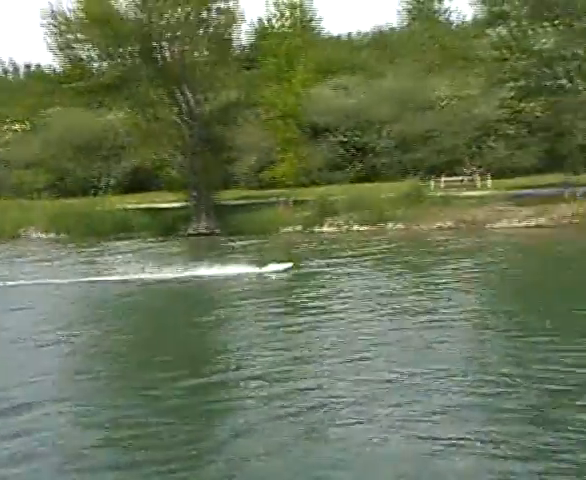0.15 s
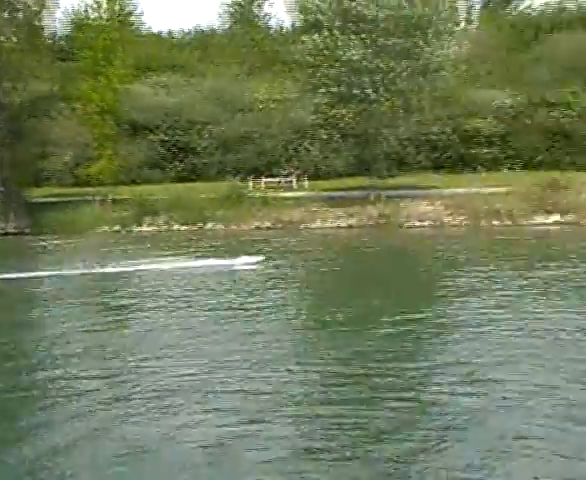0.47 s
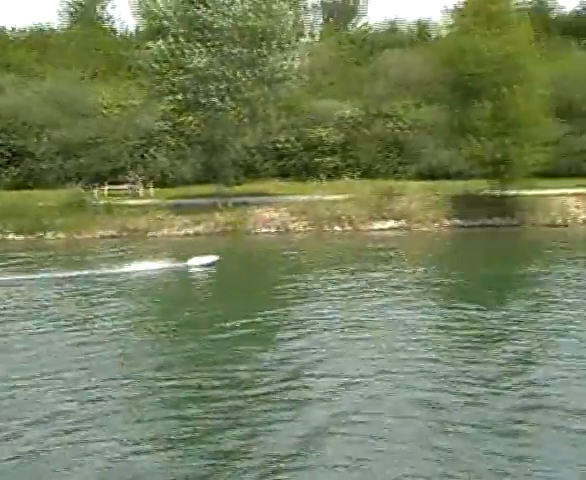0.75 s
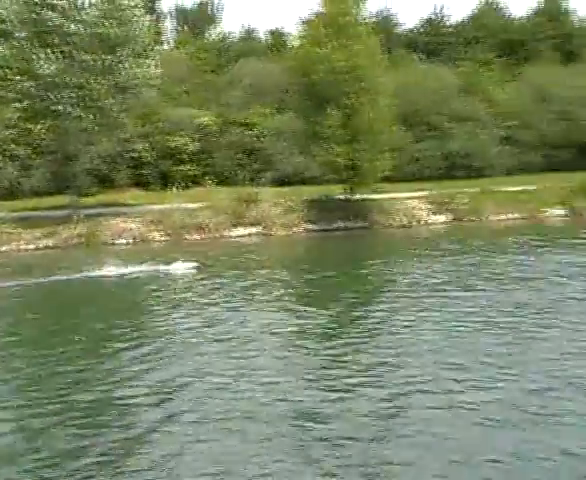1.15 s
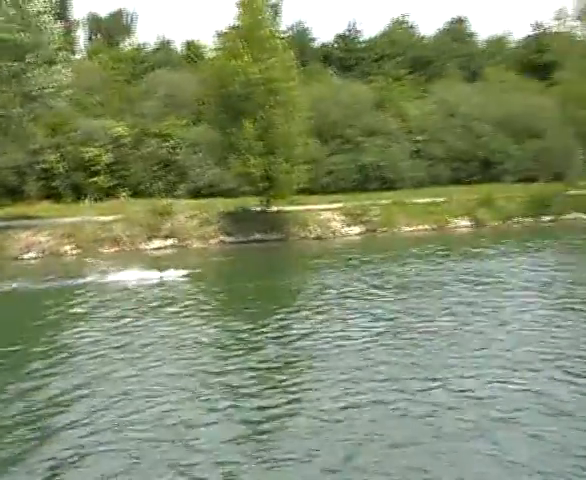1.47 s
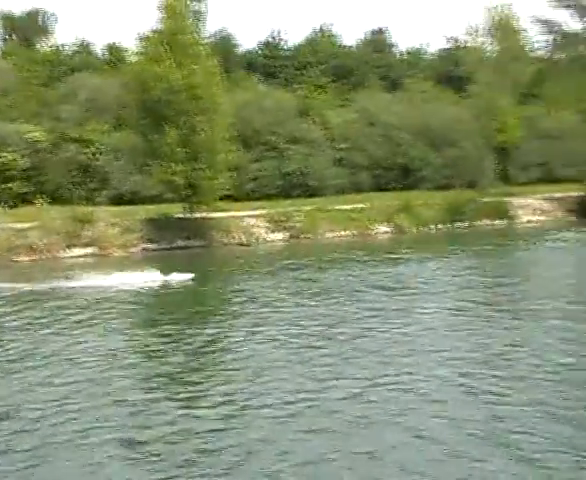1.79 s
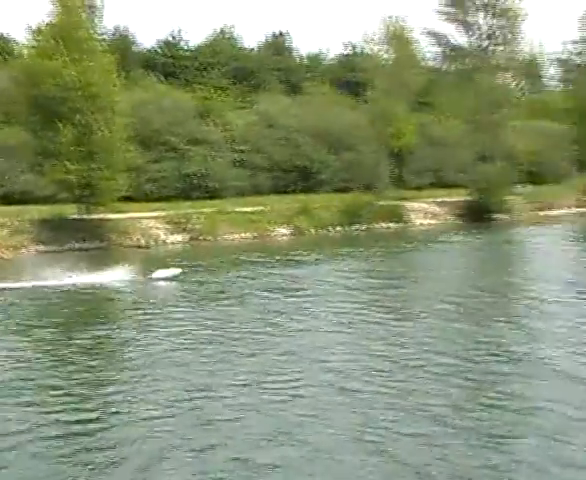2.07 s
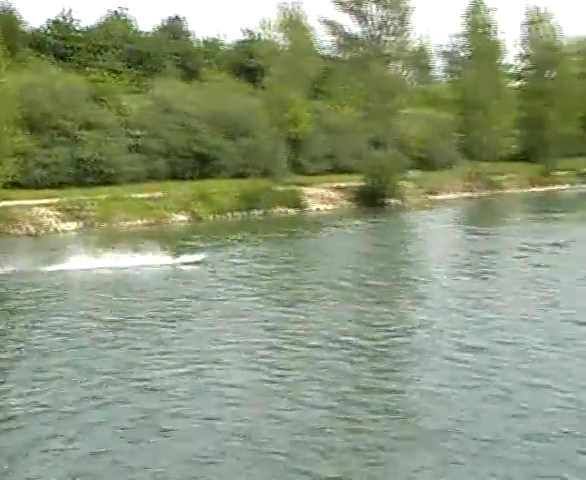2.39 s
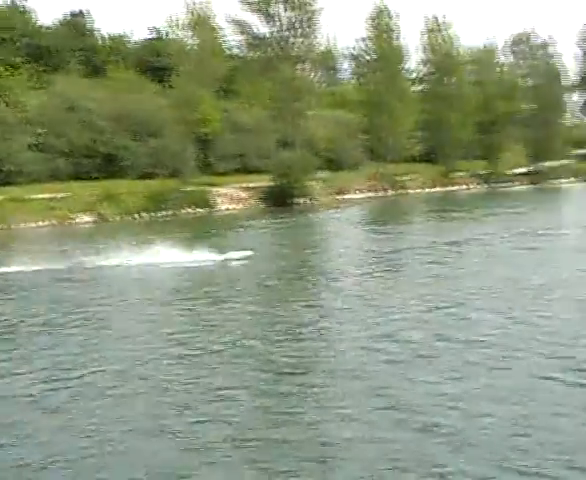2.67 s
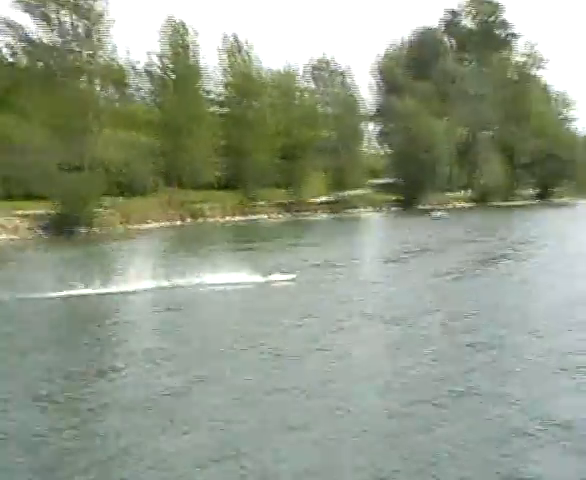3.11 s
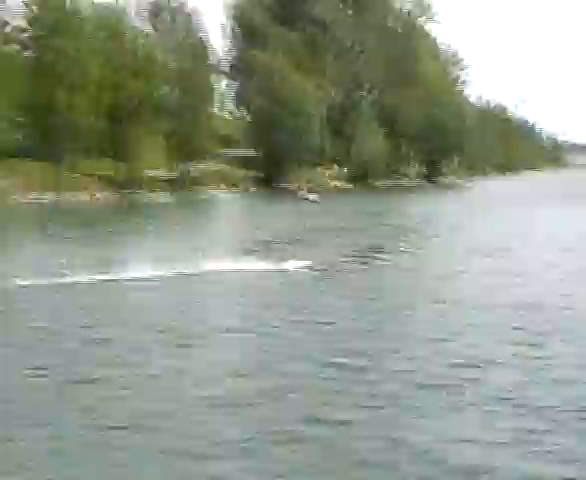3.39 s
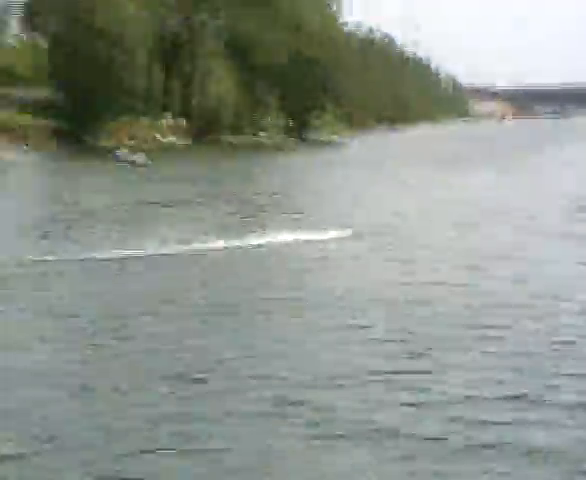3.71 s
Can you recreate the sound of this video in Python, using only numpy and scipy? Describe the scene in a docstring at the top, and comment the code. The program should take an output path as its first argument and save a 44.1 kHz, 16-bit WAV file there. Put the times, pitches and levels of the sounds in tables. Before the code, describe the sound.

Outdoors by a river, a small electric boat buzzes unsteadily, throttles off, and returns with a higher, rougher whine and hissing spray, briefly breaking up over ripples; wind buffets the microphone and the far bank echoes faintly.

```python
"""A model racing boat crosses a river: its electric motor drives a two-bladed propeller, built from
smeared overtones of the blade rate plus pulsing noise for spray. It throttles back, speeds up again and
skips over ripples; in the air the whine drops and the freed shaft hums a sine at half the blade rate.
The far bank returns a scattered echo, shaped noise makes wash, slaps and splashes, and wind buffets
the stereo microphone with slow noise, flutter and slowing swings of pressure."""
import sys
import numpy as np
from scipy import signal
from scipy.fft import rfft, irfft, next_fast_len
from scipy.io import wavfile
from scipy.ndimage import map_coordinates

SR = 44100
rng = np.random.default_rng(int(sys.argv[2]) if len(sys.argv) > 2 else 0)


def output_pcm(signal):
    """Save a mono or channel-first signal as 16-bit PCM at the path in sys.argv[1].

    Samples are clipped to [-1, 1] before scaling.
    """
    pcm = np.clip(np.atleast_2d(signal).T, -1, 1) * 32767
    wavfile.write(sys.argv[1], SR, np.round(pcm).astype(np.int16))


N = 169785

# Propeller speed before jitter: t/s, blade rate f/Hz
BLADE_RATE = [(0,715),(.11,645),(.145,712),(.2,680),(.32,650),(.37,678),(.395,728),(.425,675),(.452,725),(.475,700),(.525,600),(.555,590),(.58,505),(.72,370),(1.45,390),(1.62,525),(1.72,640),(1.76,592),(1.85,665),(1.9,658),(1.97,695),(2.035,755),(2.055,830),(2.09,772),(2.2,742),(2.26,820),(2.3,1080),(2.35,1220),(2.375,1160),(2.4,1010),(2.44,900),(2.472,980),(2.5,910),(2.585,895),(2.62,1100),(2.68,1310),(2.7,1200),(2.735,1070),(2.785,1010),(2.86,895),(2.91,915),(2.96,1070),(2.995,1140),(3.025,1150),(3.07,990),(3.12,888),(3.17,925),(3.2,1060),(3.235,1150),(3.275,1080),(3.31,930),(3.365,965),(3.395,870),(3.475,825),(3.51,900),(3.54,905),(3.58,780),(3.68,700),(3.81,728),(3.85,695)]
# How hard the propeller bites: t/s, whine level/dB, spray level/dB (before SPRAY_DB and contact changes)
BITE_LEVELS = [(0,-29,-37.5),(.12,-25,-38),(.185,-16.5,-34.5),(.23,-24.5,-35),(.315,-24,-40),(.366,-15,-35),(.4,-22,-37),(.43,-13,-33.5),(.465,-22.5,-32.5),(.5,-19,-41.5),(.53,-37,-29.5),(.56,-36.5,-36.5),(.68,-61,-40),(1,-74,-61),(1.52,-54,-50),(1.71,-33,-36.5),(1.82,-27.5,-41),(1.98,-28,-40),(2.05,-18.5,-34.5),(2.14,-19.5,-37.5),(2.2,-23.5,-39),(2.39,-18.5,-29),(2.435,-21.5,-31),(2.47,-22,-29.5),(2.54,-25.5,-31),(2.745,-20.5,-31.5),(2.79,-16,-31.5),(2.86,-26.5,-32),(2.925,-16,-33.5),(3.04,-19.5,-31),(3.12,-19,-34.5),(3.205,-14.5,-32),(3.232,-23.5,-29.5),(3.274,-13.5,-28.5),(3.3,-19.5,-37.5),(3.37,-17.5,-30),(3.46,-20.5,-35.5),(3.53,-21,-30),(3.68,-25.5,-32),(3.78,-31.5,-32.5),(3.82,-24,-27.5),(3.85,-26,-35)]
# How much the water churns round the blades: t/s, roughness (0 to 1)
ROUGHNESS = [(0,.33),(.3,.3),(.42,.15),(.55,.22),(1.7,.5),(1.92,.48),(2.03,.3),(2.2,.55),(2.45,.7),(2.8,.62),(3.2,.5),(3.5,.53),(3.85,.38)]
# Propeller out of the water: start t/s, length t/s, level change/dB
AIR_HOPS = [(2.28,.092,-22),(2.607,.117,-22),(2.762,.011,-12),(2.97,.017,-14),(3.002,.014,-9),(3.484,.016,-10),(3.786,.012,-8)]
# Propeller digs in for a moment: start t/s, length t/s, level change/dB
DIG_INS = [(.517,.008,5),(1.831,.014,4),(2.774,.008,3),(2.904,.01,5),(3.421,.012,5),(3.51,.01,5)]
# Blades clip a ripple: start t/s, length t/s, hiss level/dB, blade tone level/dB, its octave level/dB
RIPPLE_SKIMS = [(2.268,0.0059,-18.5,-23,-53),(2.345,0.0059,-21.5,-27,-29),(2.364,0.0023,-29,-28,-16),(2.619,0.024,-21,-25,-20),(2.684,0.021,-23.5,-19,-19),(2.963,0.004,-20,-28,-19),(2.988,0.017,-28.5,-37,-24)]
# Wind at the microphone: t/s, buffeting level/dB, flutter level/dB (both before random swells)
WIND_LEVELS = [(0,-22.5,-59),(.08,-36.5,-36),(.38,-28.5,-36),(.55,-31,-36.5),(.68,-24.5,-34),(.79,-25,-30.5),(.85,-23,-22),(.92,-22,-32),(.98,-30.5,-46),(1.4,-28,-37),(1.8,-31,-37),(2,-27.5,-34.5),(2.1,-21.5,-30),(2.25,-21,-31.5),(2.45,-25.5,-38.5),(2.65,-23,-22.5),(2.9,-33,-22),(3.4,-36.5,-21.5),(3.65,-44,-24.5),(3.85,-44,-34)]
# Wavelets slapping: t/s, level/dB
WAVELET_SLAPS = [(.6968,-20),(.7652,-21)]
# Eddies striking the microphone: t/s, level/dB, right port's starting pitch f/Hz, balance (-1 left to 1 right)
EDDY_HITS = [(.7556,-.5,380,.3),(.8394,0,350,.2),(.8917,-11,250,.2)]
# Splashes: t/s, level/dB, rise time constant t/s, decay by 60 dB t/s
SPLASH_EVENTS = [(.772,-27,0.037,0.25),(1.019,-31,0.0035,0.029),(1.092,-27,0.014,0.19),(1.251,-28,0.0085,0.045),(1.376,-29,0.0026,0.13)]
# How the hull radiates the blade overtones: f/Hz, gain/dB
HULL_RADIATION = [(700,1),(1380,1.5),(1580,-4),(1780,-1.5),(2300,-3),(2700,-6),(3300,-14.5),(4500,-13.5),(5800,-20),(10000,-25.5)]
# Noise colours: f/Hz, relative level/dB
SPRAY_COLOUR = [(200,-46),(500,7.5),(900,11.5),(1400,4.5),(2300,7),(3300,-3),(5500,-5),(8000,-10),(10500,-18.5)]
FIZZ_COLOUR = [(2000,-21),(5800,-2.5),(8500,-5),(10500,-15.5)]
RIVER_COLOUR = [(60,13),(300,-1.5),(700,6),(1500,2),(2500,-3),(4000,-5),(7000,-9),(10500,-21)]
BUFFET_COLOUR = [(30,-16),(70,-4.5),(120,-3),(200,-5.5),(350,-17.5),(800,-53),(3000,-47)]
FLUTTER_COLOUR = [(50,-36),(110,-7),(190,-1.5),(320,-2.5),(550,-11),(1100,-24),(3000,-29.5),(10000,-41.5)]
SLAP_COLOUR = [(500,-23),(1200,6),(2400,-3),(4000,-16),(10000,-25)]
PUFF_COLOUR = [(50,2),(120,-3),(300,4),(800,-10),(1300,-20),(4000,-48)]
SPLASH_COLOUR = [(150,-43),(500,2),(1200,-4),(2500,-3),(4000,-12.5),(8000,-15.5),(10500,-26.5)]
SKIM_COLOUR = [(400, 3.0), (1500, -3.5), (5000, -1.5), (10000, -9)]

EDGE_S = 0.0019  # ramp at each end of a brief event
# Propeller; rates are random knots a second, and JITTER is a fraction of the blade rate
JITTER, JITTER_RATE = .016, 90
CHURN_RATE, RASP_RATE, RASP = 110, 380, .5  # slow churn, fast rasp and the rasp's weight
OVERTONE_BLUR = 1.35  # how fast churning blurs the higher overtones
OVERTONE_SHARE = .34  # overtones follow the blade tone by this share and the spray by the rest
FADE_DB, FADE_RATE = 1.6, 40  # partials fade in and out, the higher ones more deeply
CHOP_DB, CHOP_RATE = 2.8, 70  # ripples chop whine and spray together: depth at full roughness
SPRAY_DB, SPRAY_PULSING, SPRAY_FLICKER_DB = 5.5, 0.25, 3.5
# Cavitation: gain on the spray curve from this blade rate upwards, and its fall per Hz below it
FIZZ_DB, FIZZ_HZ, FIZZ_DB_PER_HZ = -3, 1080, .04
# Far bank: echo level, time over which it builds, decay by 60 dB
BANK_DB, BANK_RISE_S, BANK_T60_S = -17, 0.17, 0.63
# Water
RIVER_DB, RIVER_SWELL_DB = -36.5, 1.6
SLAP_T60_S, SPLASH_GRAIN_DB = .022, 3.5
# Wind: eddies cross the left port first
PORT_LAG_S = 0.00209
EDDY_CYCLES, EDDY_PEAK, EDDY_WIDTH = .9, .55, .65  # in cycles: slowing of the swing, its crest, its spread
LEFT_PITCH, EDDY_LAG_S = .7, .0023  # an eddy meets the left port first and more slowly
PUFF_DB, PUFF_S = -18, .012  # turbulence round each eddy: level, spread
# Skims and flight
SKIM_RASP = .35  # unsteadiness of the blade tones during a skim
SHAFT_DB, SHAFT_BUILD_S = -25, 0.058
FLIGHT_S = 0.09  # longest time fully clear of the water
# Pick-up: low cut, peak ceiling, sharpness of its knee, top of the band
LOW_CUT_HZ, CEILING, CLIP_HARDNESS, TOP_HZ = 74, .95, 6, 10800


def amp(db):
    """Decibels to gain."""
    return 10 ** (np.asarray(db) / 20)


def unit(x):
    """Scale to rms 1."""
    return x / np.sqrt(np.mean(x ** 2) + 1e-20)


def clock():
    """Time of each sample in seconds."""
    return np.arange(N) / SR


def curves(rows):
    """One value per sample for each column after the time."""
    s, *cols = np.transpose(rows)
    return [np.interp(clock(), s, c) for c in cols]


def wobble(rate):
    """A smooth random curve, rate knots a second."""
    knots = rng.standard_normal(int(N * rate / SR) + 4)
    return map_coordinates(knots, [clock() * rate], mode="nearest")


def filtered(x, response):
    """Apply a response of frequency to x."""
    m = next_fast_len(N + SR // 2)
    return irfft(rfft(x, m) * response(np.fft.rfftfreq(m, 1 / SR)), m)[..., :N]


def noise(colour, side_db):
    """Coloured noise of rms 1; side_db sets its stereo width against the middle."""
    f, db = np.transpose(colour)
    white = rng.standard_normal((2, N))
    mid, side = filtered(white, lambda hz: amp(np.interp(np.log(hz + 1), np.log(f), db)))
    side = amp(side_db) * side
    return unit(np.array([mid + side, mid - side]))


def gate(start, length):
    """1 during an event, with short ramps."""
    return np.clip((length / 2 - abs(clock() - start - length / 2)) / EDGE_S + .5, 0, 1)


def churn(rate):
    """Random swing of a partial's strength and phase."""
    return wobble(rate) + 1j * wobble(rate)


def blade_angle():
    """Phase of the blade passes, slightly unsteady under load."""
    hz, = curves(BLADE_RATE)
    return 2 * np.pi * np.cumsum(hz * (1 + JITTER * wobble(JITTER_RATE))) / SR


def blade_pulsing(angle):
    """Each blade pass swells the water noise once."""
    return 1 + SPRAY_PULSING * np.cos(angle)


def blade_whine(angle, whine_db, spray_db, rough, hz):
    """Churning smears the blade tone and its overtones, which grow with the spray and ring through the hull."""
    overtone_db = OVERTONE_SHARE * whine_db + (1 - OVERTONE_SHARE) * spray_db
    whine = np.zeros(N)
    for k in range(1, 11):
        clean = (1 - rough) ** (1 + OVERTONE_BLUR * (k - 1))
        smear = churn(CHURN_RATE * np.sqrt(k)) + RASP * churn(RASP_RATE * np.sqrt(k))
        swing = np.sqrt(clean) + np.sqrt(1 - clean) * smear / np.std(smear)
        fade = amp(FADE_DB * np.sqrt(k) * wobble(FADE_RATE))
        partial = unit(np.real(swing * np.exp(1j * k * angle)) * fade)
        hull_db = np.interp(k * hz, *np.transpose(HULL_RADIATION))
        level_db = whine_db if k == 1 else overtone_db + hull_db
        whine += amp(level_db) * partial
    return whine


def blade_spray(angle, spray_db, hz):
    """Spray noise pulses with the blades and flickers; cavitation fizz grows with speed up to a limit."""
    pulsing = unit(blade_pulsing(angle) * amp(SPRAY_FLICKER_DB * wobble(300)))
    spray = amp(SPRAY_DB) * noise(SPRAY_COLOUR, side_db=-16.5)
    fizz_db = FIZZ_DB + FIZZ_DB_PER_HZ * np.minimum(hz - FIZZ_HZ, 0)
    fizz = amp(fizz_db) * noise(FIZZ_COLOUR, side_db=-8.5)
    return amp(spray_db) * pulsing * (spray + fizz)


def propeller(angle):
    """Whine and spray vary together with water contact: hops weaken, dig-ins strengthen, ripples chop."""
    whine_db, spray_db = curves(BITE_LEVELS)
    rough, = curves(ROUGHNESS)
    hz, = curves(BLADE_RATE)
    whine = blade_whine(angle, whine_db, spray_db, rough, hz)
    spray = blade_spray(angle, spray_db, hz)
    contacts = list(AIR_HOPS) + list(DIG_INS)
    contact_db = sum(db * gate(s, length) for s, length, db in contacts)
    chop_db = CHOP_DB * rough * wobble(CHOP_RATE)
    return amp(contact_db + chop_db) * (whine + spray)


def bank(x):
    """Trees on the far bank scatter the sound into a dull echo that builds, then decays."""
    t = np.arange(SR) / SR
    tail = rng.standard_normal((2, SR)) * amp(-60 * t / BANK_T60_S) * np.clip(t / BANK_RISE_S, 0, 1)
    echo = signal.fftconvolve(x[None], tail / np.linalg.norm(tail[0]), axes=1)[:, :N]
    return amp(BANK_DB) * filtered(echo, lambda hz: 1 / (1 + (hz / 4500) ** 2))


def river():
    """Flowing water gives a steady wash of noise with small swells."""
    return amp(RIVER_DB + RIVER_SWELL_DB * wobble(22.3)) * noise(RIVER_COLOUR, side_db=-17)


def wind():
    """Lumpy buffeting and a higher flutter, which reach the right port a moment after the left."""
    buffet_db, flutter_db = curves(WIND_LEVELS)
    buffet = amp(buffet_db + 2.26 * wobble(22.2)) * noise(BUFFET_COLOUR, side_db=-2.5)
    flutter = amp(flutter_db + 2.3 * wobble(29.78)) * noise(FLUTTER_COLOUR, side_db=0)
    flutter = flutter * amp(np.array([[-1.6], [1.6]]))  # stronger on the right
    ports = np.array([[1], [-1]])  # left early, right late, by half the lag each
    return filtered(buffet + flutter, lambda hz: np.exp(1j * np.pi * hz * PORT_LAG_S * ports))


def slaps():
    """Wavelets slap: each a sudden wet tick of noise that decays fast."""
    t = clock()
    strength = sum((t >= s) * amp(db - 60 * abs(t - s) / SLAP_T60_S) for s, db in WAVELET_SLAPS)
    return strength * noise(SLAP_COLOUR, side_db=-17)


def thumps():
    """Eddies hit the microphone: a sharp push, a deep pull and a slow recovery, inside a puff of turbulence."""
    out, t = np.zeros((2, N)), clock()
    puff = noise(PUFF_COLOUR, side_db=6)
    for s, db, hz, side in EDDY_HITS:
        left_s = t - s + EDDY_LAG_S
        turns = hz * np.maximum([LEFT_PITCH * left_s, t - s], 0)
        cycles = EDDY_CYCLES * np.log1p(turns / EDDY_CYCLES)  # the swing slows as it goes
        swing = np.sin(2 * np.pi * cycles) * np.exp(-((cycles - EDDY_PEAK) / EDDY_WIDTH) ** 2)
        turbulence = amp(PUFF_DB) * puff * np.exp(-(left_s / PUFF_S) ** 2)
        out += amp(db) * (swing + turbulence) * np.array([[1 - side], [1 + side]])
    return out


def splashes():
    """Splashing water: grainy noise that swells and dies away exponentially."""
    t = clock()
    swell = np.zeros(N)
    for s, db, rise, t60 in SPLASH_EVENTS:
        decay = amp(db - 60 * np.maximum(t - s, 0) / t60)
        swell += decay * np.exp(np.minimum(t - s, 0) / rise)
    grain = amp(SPLASH_GRAIN_DB * wobble(400))
    return swell * unit(noise(SPLASH_COLOUR, side_db=-18) * grain)


def skims(angle):
    """Racing blades touch water in short rasps: pulsing hiss, an unsteady blade tone and its octave."""
    hiss = noise(SKIM_COLOUR, side_db=-14.0) * blade_pulsing(angle)
    tone, octave = [unit(np.real((1 + SKIM_RASP * churn(RASP_RATE)) * np.exp(1j * k * angle)))
                    for k in (1, 2)]
    out = np.zeros((2, N))
    for s, length, hiss_db, tone_db, octave_db in RIPPLE_SKIMS:
        rasp = amp(hiss_db) * hiss + amp(tone_db) * tone + amp(octave_db) * octave
        out += gate(s, length) * rasp
    return out


def free_shaft(angle):
    """In the air the two-bladed shaft hums once a turn, half the blade rate, building up during each flight."""
    t = clock()
    airborne = np.zeros(N)
    for s, length, _ in AIR_HOPS:
        airborne += gate(s, min(length, FLIGHT_S)) * np.clip((t - s) / SHAFT_BUILD_S, 0, 1)
    return amp(SHAFT_DB) * airborne * unit(np.sin(angle / 2))


def scene():
    """Boat and its echo off the far bank, river water, and wind at the microphone."""
    angle = blade_angle()
    boat = propeller(angle) + skims(angle) + free_shaft(angle)
    water = river() + slaps() + splashes()
    return boat + bank(boat.mean(axis=0)) + water + wind() + thumps()


def record(dry):
    """The pick-up thins the deep bass, rounds off the highest peaks and cuts the top of the band."""
    thin = filtered(dry, lambda hz: hz ** 2 / np.sqrt(hz ** 4 + LOW_CUT_HZ ** 4))
    rounded = thin / (1 + abs(thin / CEILING) ** CLIP_HARDNESS) ** (1 / CLIP_HARDNESS)
    return filtered(rounded, lambda hz: np.clip((TOP_HZ - hz) / 300 + .5, 0, 1))


dry = scene()
out = record(dry)
output_pcm(out)
```